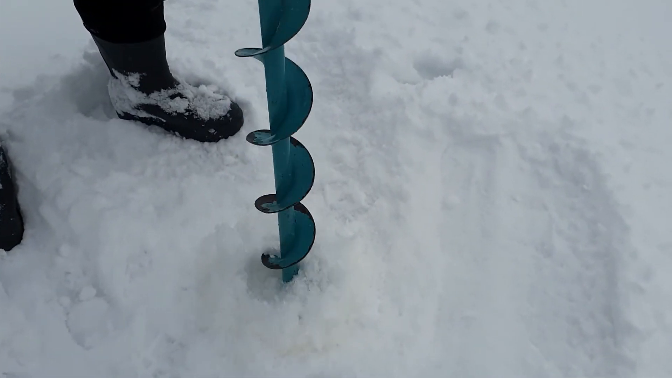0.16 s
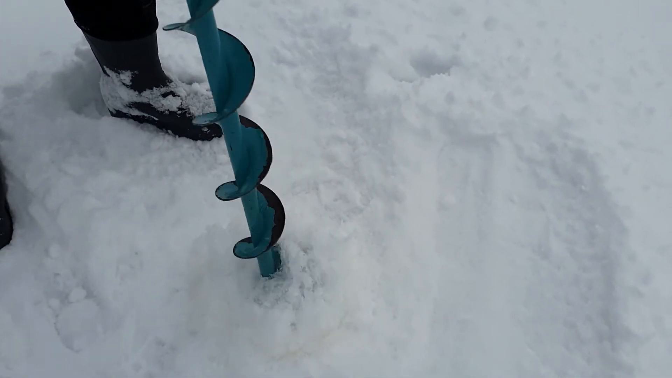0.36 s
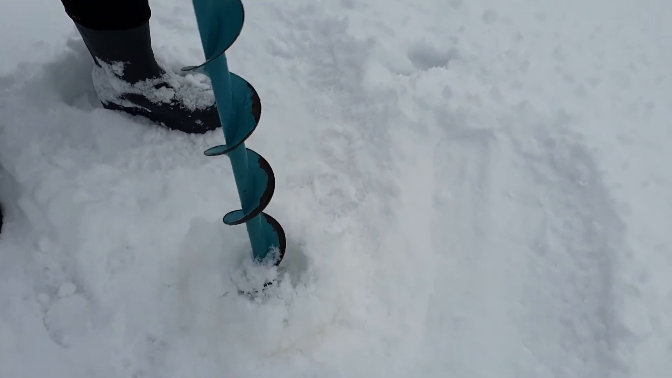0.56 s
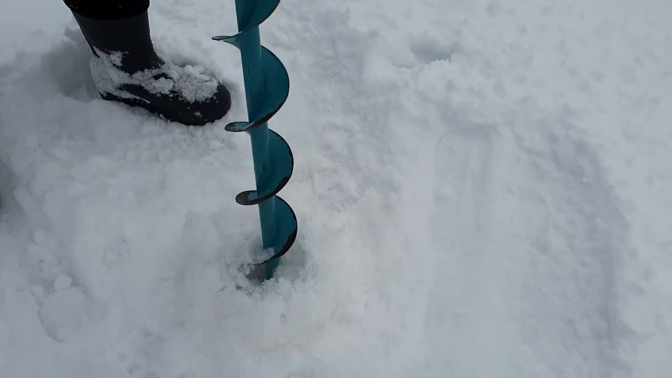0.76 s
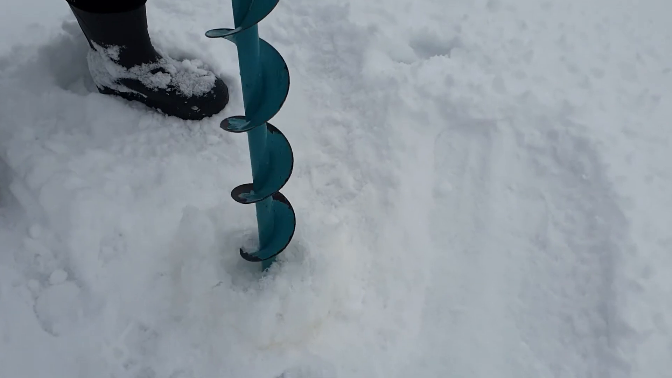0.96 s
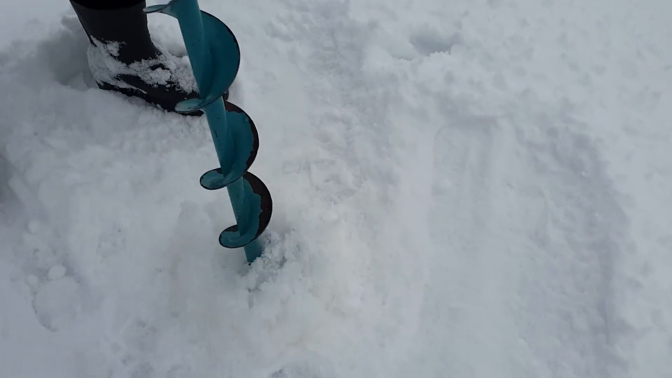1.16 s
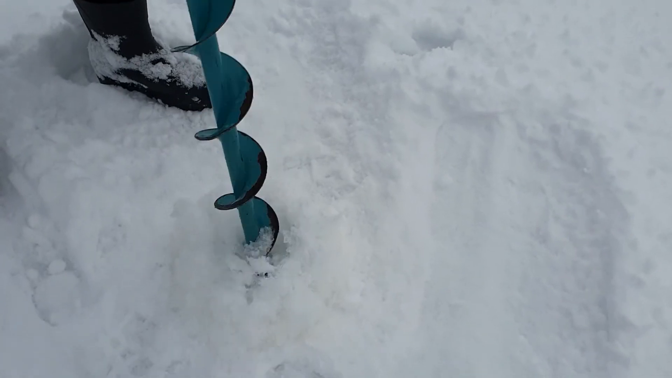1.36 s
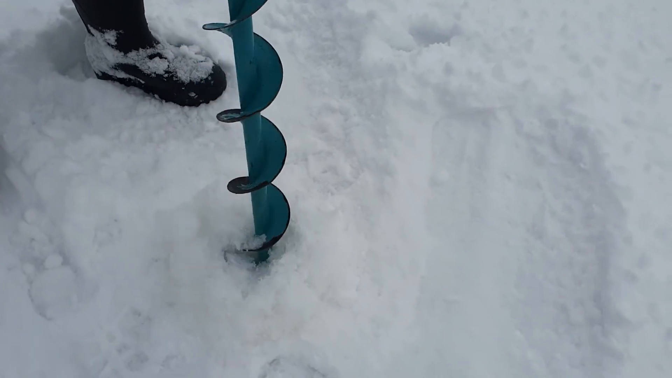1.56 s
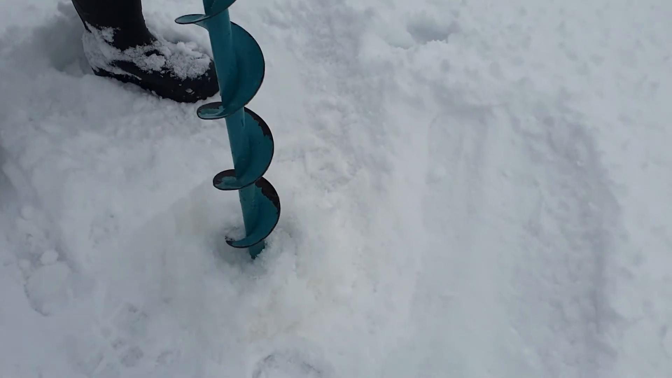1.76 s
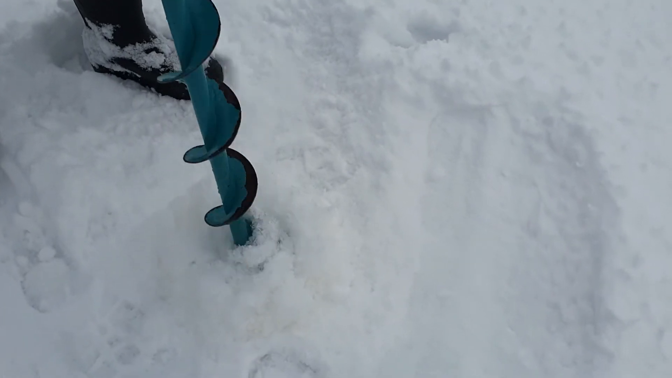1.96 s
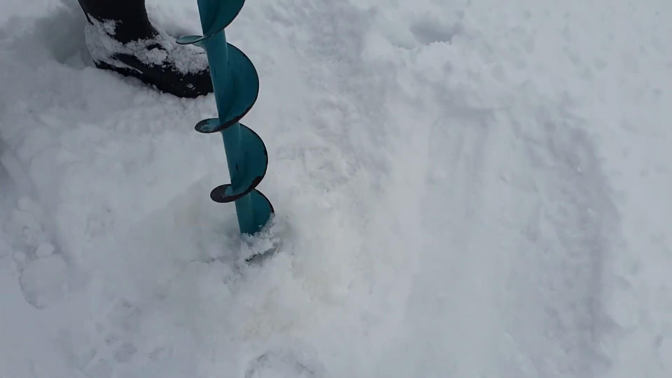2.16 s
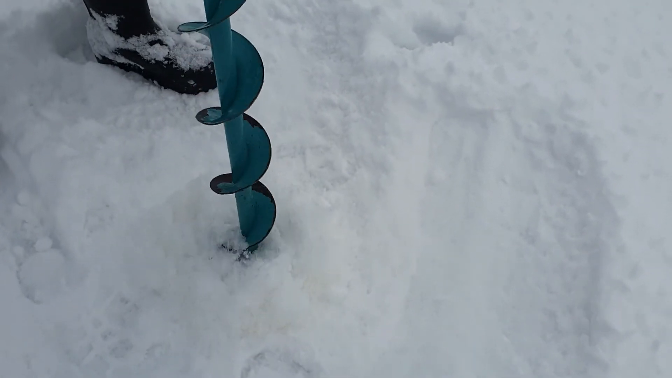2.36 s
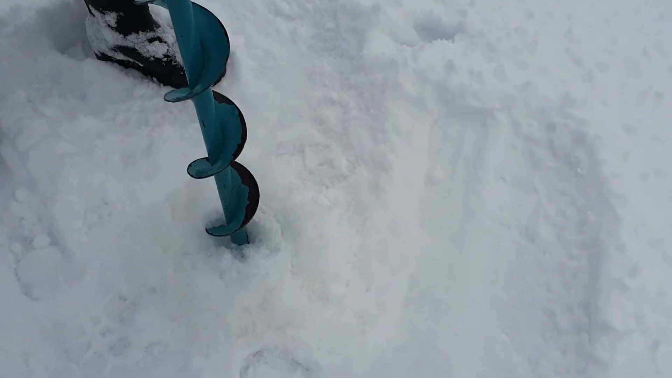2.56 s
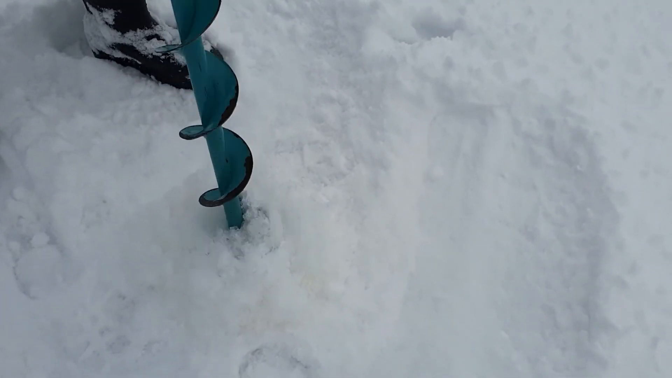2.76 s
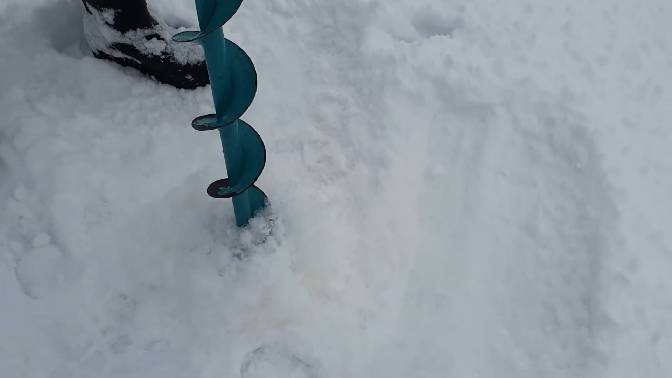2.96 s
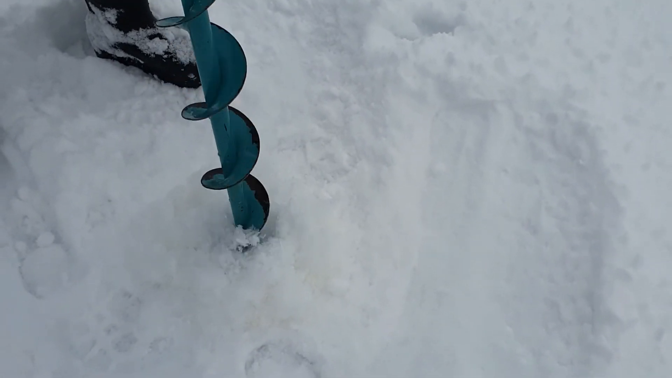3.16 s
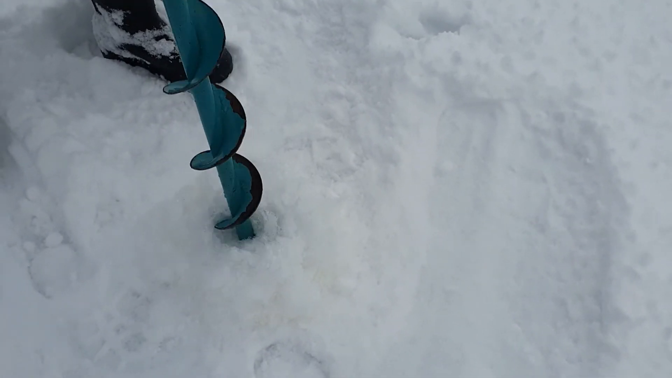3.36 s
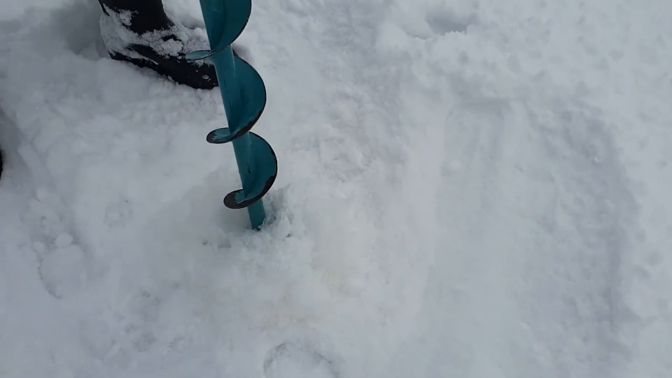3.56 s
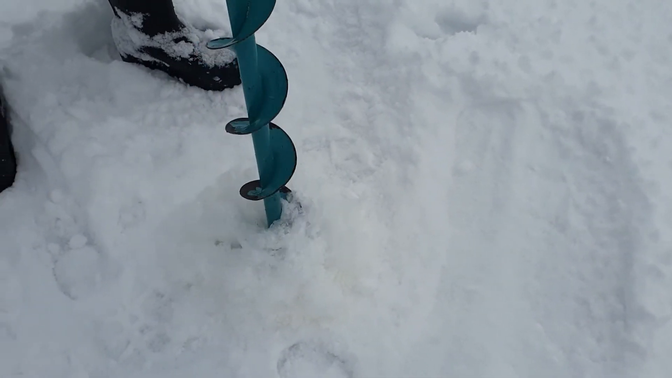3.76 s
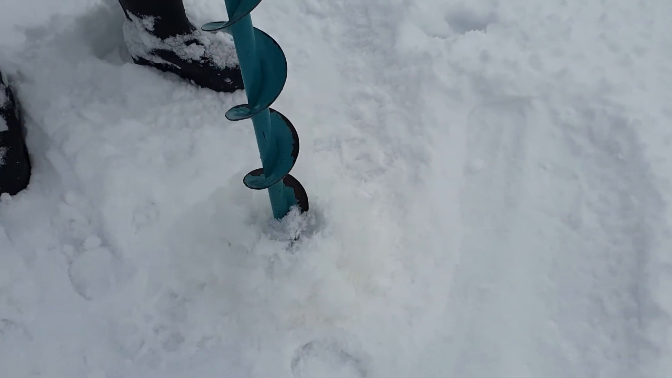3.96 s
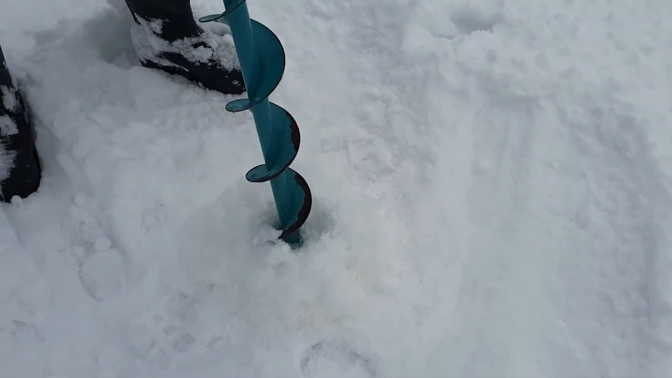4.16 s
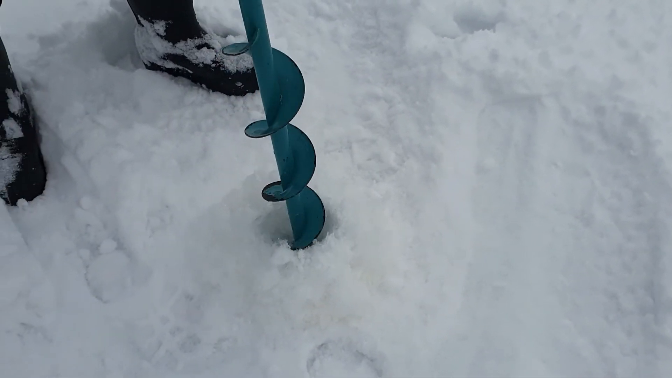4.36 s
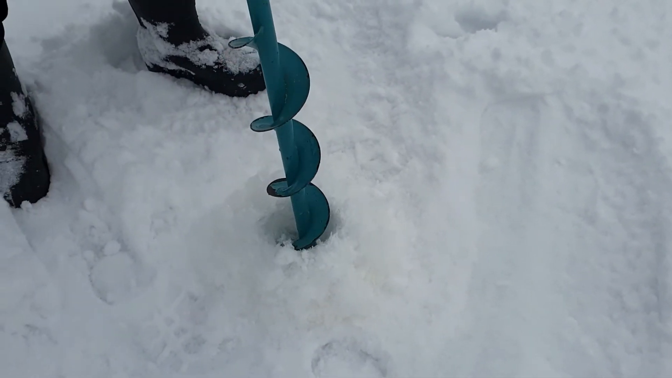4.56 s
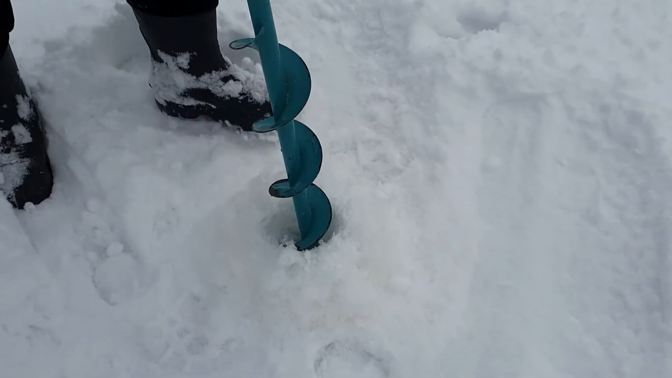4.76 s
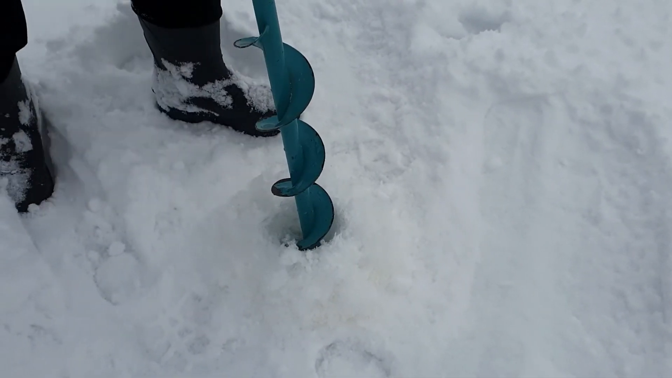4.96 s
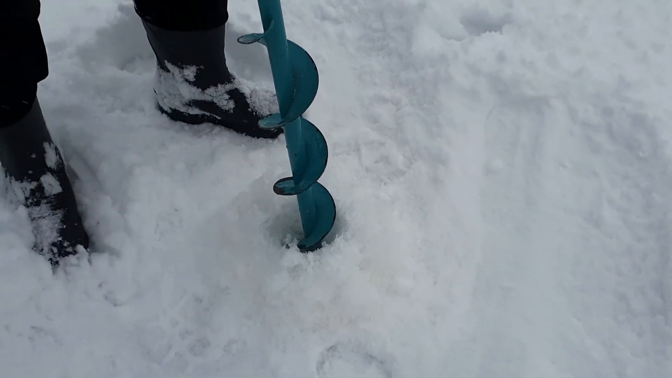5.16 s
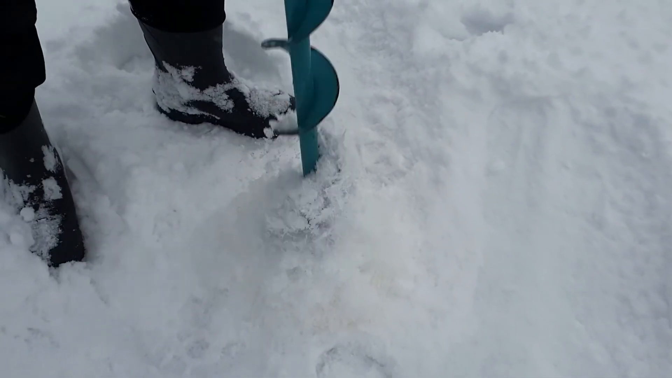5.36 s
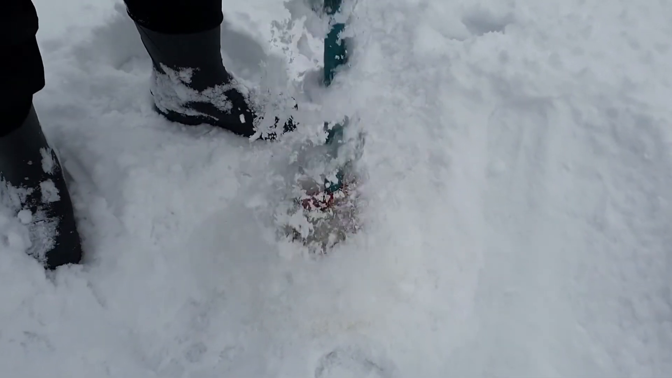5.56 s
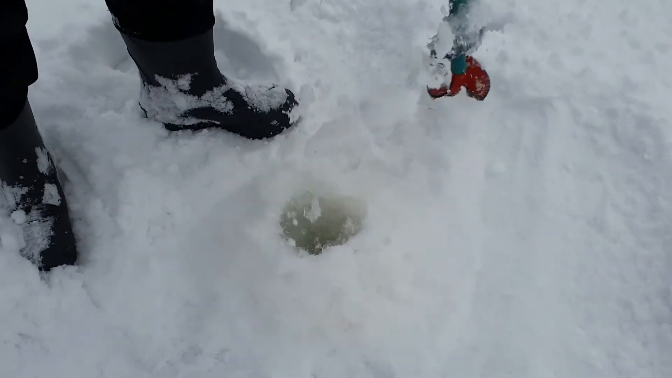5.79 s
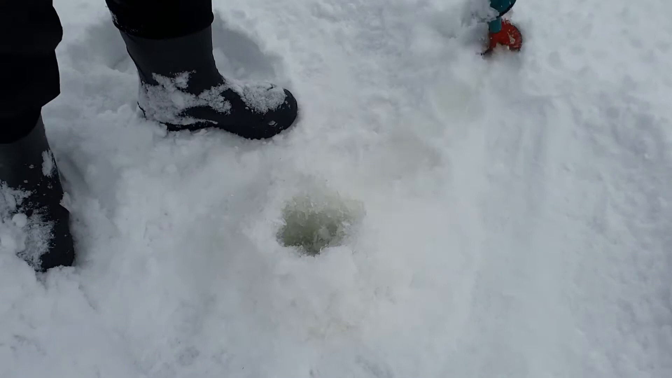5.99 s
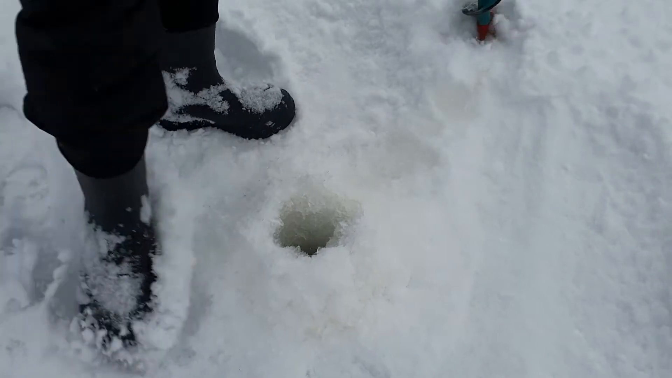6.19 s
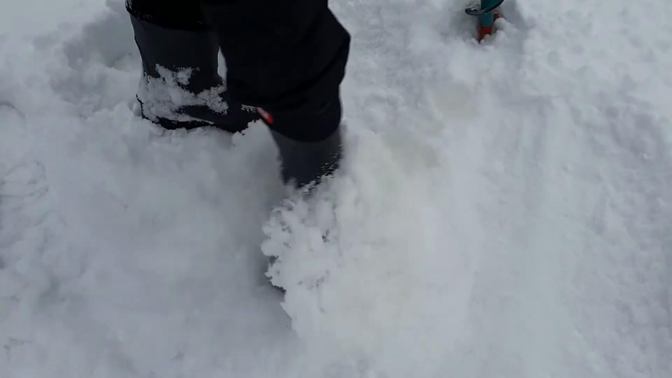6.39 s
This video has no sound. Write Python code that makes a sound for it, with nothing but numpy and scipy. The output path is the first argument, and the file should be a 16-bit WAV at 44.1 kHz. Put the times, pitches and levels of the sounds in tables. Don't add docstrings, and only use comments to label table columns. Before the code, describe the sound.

Outdoors on snow-covered river ice, heard close in dry stereo. From 0 to about 4.2 seconds a hand-turned auger grinds steadily, its crunchy, splintering bite swaying with each turn of roughly 0.7 seconds. Ice chips snap irregularly, the steel spiral rings with thin metallic tones, a squeaky pitch climbs each turn, and fine scraping, powdery hiss and low shaft rumble surround it. Blades briefly stall and crack free. Around 4.25 the bit drops through, rattles loosely and dies by 4.4. Near quiet follows, with faint snow creaks and soft boot thuds, a firmer one near 5.05. From 5.3 to 5.55 the spiral is yanked out, rubbing and knocking the hole wall; slush gushes with a jumping, rising hollow pitch until 5.7. Wet lumps thump around 5.8, loose snow trickles, and boots crunch and thud until about 6.4, with a small sharp snap near 6.2.

```python
import sys
import numpy as np
from scipy import signal
from scipy.fft import rfft, irfft
from scipy.io import wavfile

SR = 44100
rng = np.random.default_rng(int(sys.argv[2]) if len(sys.argv) > 2 else 0)


def decibels_to_gain(level_db):
    exponent = np.asarray(level_db, float) / 20
    return 10 ** exponent


def unload_audio(sound):
    columns = np.transpose(np.atleast_2d(sound))
    steps = np.round(np.clip(columns, -1, 1) * 32767)
    wavfile.write(sys.argv[1], SR, steps.astype(np.int16))


N = 283563
T = np.arange(N) / SR
SLOW_T = T[::64]
HZ = np.fft.rfftfreq(4096, 1 / SR)
TURN_S = 0.722
THROUGH_S, LIFTING_S = 4.252, 5


def evened(x):
    return x / np.sqrt(np.mean(x ** 2) + 1e-20)


def read(points, hz):
    f, value = np.transpose(points)
    return np.interp(np.log(hz + 1), np.log(f + 1), value)


def along(rows):
    s, level, *others = np.transpose(rows)
    first = np.interp(T, s, level, left=-140, right=-140)
    return [first] + [np.interp(T, s, column) for column in others]


def smooth(slow):
    return np.interp(T, SLOW_T, slow)


def drift(top_hz):
    count = len(SLOW_T)
    z = rfft(rng.standard_normal(count))
    return evened(irfft(z / (1 + (np.fft.rfftfreq(count, 64 / SR) / top_hz) ** 2), count))


def colour(x, points):
    log_gain = np.log(decibels_to_gain(np.maximum(read(points, HZ), -90)))
    circle = np.concatenate([log_gain, log_gain[-2:0:-1]])
    taps = np.fft.ifft(np.exp(np.conj(signal.hilbert(circle)))).real[:2048]
    return signal.oaconvolve(x, taps / np.linalg.norm(taps))[:len(x)]


def ring(x, hz, width):
    r = np.exp(-np.pi * width / SR)
    return signal.lfilter([(1 - r * r) / 2, 0, (r * r - 1) / 2], [1, -2 * r * np.cos(2 * np.pi * hz / SR), r * r], x)


def glide(x, hz, width):
    turn = np.exp(2j * np.pi * np.cumsum(hz) / SR)
    r = np.exp(-np.pi * width / SR)
    return 2 * (turn * signal.lfilter([1 - r], [1, -r], x / turn)).real


def chips(per_s, spread_db, burst_ms, bed):
    size = decibels_to_gain(spread_db * np.minimum(rng.exponential(1, N), 4)) * (rng.random(N) < per_s / SR)
    r = np.exp(-1000 / (burst_ms * SR))
    bursts = evened(signal.lfilter([1], [1, -r], size))
    return evened((bed + bursts) * rng.standard_normal(N))


def add(mix, s, sound):
    part = mix[round(s * SR):][:len(sound)]
    part += sound[:len(part)]


# time_s, level_db
PRESS = [(0.0, -21.5), (0.4, -21.5), (0.48, -19), (0.62, -26), (0.76, -28.5), (0.84, -19.5), (0.95, -22.5),
         (1.29, -20.5), (1.48, -23.5), (1.88, -19), (2.3, -22), (3.0, -23), (3.31, -20.5), (3.45, -23.5),
         (3.55, -22), (3.76, -24), (3.81, -19.5), (3.93, -26.5)]
# time_s, level_db
THROUGH = [
    (3.931, -25.5),
    (4.06, -21),
    (4.14, -24),
    (4.235, -24),
    (4.255, -25),
    (4.32, -20.5),
    (4.369, -32),
    (4.39, -43.5),
    (4.56, -67),
]
# time_s, level_db
LIFT = [
    (5.26, -65),
    (5.292, -34),
    (5.308, -39),
    (5.318, -24),
    (5.36, -30),
    (5.41, -23),
    (5.455, -25),
    (5.49, -16),
    (5.502, -30),
    (5.68, -51),
]
# usual_db, lost_db (per dB of harder cut), ceiling_db
SHARES = [
    [(-9.5, 1.1, -2.5), (-19, 0.5, -14), (-10, 1.48, 3)],
    [(-4, -0.1, 3), (-14, 0.2, -5), (-13.5, -0.5, -4)],
    [(-20, 1.3, 0), (-41, 2.5, -14), (-36, 0, -11)],
]
# cosine_db, sine_db (of crank angle), deeper_db (per second)
CRANK = [(-1.2, 4.8, -2.1), (.5, -.2, -.7), (-.4, -.2, -.05)]


def effort():
    cut_db = np.max([along(rows)[0] for rows in (PRESS, THROUGH, LIFT)], axis=0)
    stage = (T > THROUGH_S).astype(int) + (T > LIFTING_S)
    angle, layers = 2 * np.pi * T / TURN_S, []
    for k, (cos_db, sin_db, deeper_db) in enumerate(CRANK):
        usual_db, lost, top_db = (column[stage] for column in np.array(SHARES)[:, k].T)
        turn_db = (cos_db * np.cos(angle) + sin_db * np.sin(angle) + deeper_db * T) * (stage == 0)
        layers.append(np.minimum(usual_db - lost * (cut_db + 22), top_db) + turn_db)
    return cut_db, *layers


# time_s, peak_db, snap_hz
CRACKS = [(0.417, -13, 2030), (0.439, -4, 2040), (0.469, -5, 2100), (0.819, -10, 1540), (0.879, -4.5, 1900),
          (0.947, -4, 1510), (0.977, -3, 2070), (1.101, -7, 2750), (1.172, -6.5, 2130), (1.216, -12, 2110),
          (1.897, 0, 1490), (1.922, -2.5, 2680), (2.183, -3.5, 1740), (2.221, -11, 2080),
          (2.776, -4.5, 2470), (3.027, -4, 2600), (3.316, -6, 2150), (3.363, -10, 2210), (3.628, -2, 2170),
          (3.649, -2, 1490), (3.95, -9, 1070), (4.2014, -7, 2170), (4.216, -5, 2200)]
# time_s, peak_db, snap_hz
FLAKES = [(0.0394, -9, 2010), (0.0644, -7, 1520), (0.1044, -8, 2210), (0.1344, -6, 2050),
          (0.1644, -9, 2050), (0.3002, -8, 2020), (0.3444, -8, 2070), (0.3844, -11, 2700),
          (0.4953, -9, 2080), (0.7756, -14, 1860), (0.8444, -8, 1990), (1.0294, -10, 2030),
          (1.3169, -10, 2450), (1.3877, -10, 1530), (1.4546, -9, 1820), (1.5584, -9, 1510),
          (1.5798, -8, 1230), (1.6327, -8, 2050), (1.7235, -6, 2050), (1.7918, -7, 2720),
          (1.8347, -8, 2710), (1.8572, -7, 2050), (1.9969, -12, 2210), (2.0677, -10, 1740),
          (2.0894, -10, 2030), (2.148, -10, 2060), (2.2767, -10, 1490), (2.3394, -11, 2050),
          (2.4319, -11, 2080), (2.4563, -12, 1440), (2.4894, -8, 2080), (2.7217, -12, 1130),
          (2.7472, -13, 1770), (2.8734, -9, 1880), (2.9387, -11, 1970), (3.7424, -10, 1960),
          (3.7958, -7, 2030), (3.8114, -9, 2000), (3.8407, -9, 2030), (4.0677, -10, 1530),
          (4.1014, -8, 2160), (4.1129, -5, 2160), (4.156, -12, 2160)]
# time_s, peak_db, snap_hz, stall_db (just before)
CATCHES = [(0.229, -5, 2200, -9), (0.256, -6, 2040, -6), (0.629, -6, 2360, -15), (0.675, -4, 2270, -21),
           (0.702, -7, 1990, -5.5), (0.731, -6, 1820, -2), (1.265, -7, 1120, -2), (1.479, -2, 1840, -9),
           (2.524, -2, 2040, -8), (3.203, -1, 2130, -9), (3.676, -3, 1490, -7), (3.137, -5.5, 2050, -6),
           (3.165, -3, 2620, -12), (3.8736, 1, 1950, -8), (3.9853, 0, 2500, -5), (4.091, -4, 1280, -8),
           (4.233, -2, 1970, -8)]
# time_s, peak_db, snap_hz, lull_db (just before), fade_ms
KNOCKS = [(4.262, -4, 3300, 1, 15), (4.299, -7, 3360, -19.5, 5), (4.316, -5, 3430, -1, 14),
          (4.364, -2.5, 2600, -1, 5.4), (4.416, -30, 3190, 0, 5), (4.524, -32, 3190, 0, 3),
          (5.284, -26, 1820, 7, 6.8), (5.318, -5.5, 1040, -4, 13.5), (5.344, -5, 2780, 4, 7.6),
          (5.367, -3, 1100, -18, 14), (5.408, -9, 2050, -3, 11), (5.464, -8, 1630, -2.5, 6.8),
          (5.479, -6, 2000, -3, 12), (5.518, -15, 1990, -6, 7), (5.531, -9.5, 1990, -6, 7),
          (5.567, -19, 2000, -11, 9), (6.228, -13, 2100, -4, 8.9)]


def fractures():
    breaks = [(*row, -3, 3.6) for row in CRACKS] + [(*row, 3.4) for row in CATCHES] + KNOCKS
    breaks += [(s, db + 1.5, hz, -2.5, 5.5) for s, db, hz in FLAKES]
    stall_db, jolts, snaps = np.zeros(N), np.zeros(N), np.zeros(N)
    t = np.arange(1800) / SR
    for (s, db, hz, before_db, ms), noise in zip(breaks, rng.standard_normal((len(breaks), len(t)))):
        lead_s = 0.008 + 0.0011 * abs(before_db)
        build = np.minimum(np.arange(round((lead_s + 0.003) * SR)) / (lead_s * SR), 1)
        add(stall_db, s - lead_s, before_db * build)
        burst = noise * (1 - np.exp(-t / 0.00036)) * np.exp(-1000 * t / max(ms, 1))
        add(jolts, s, decibels_to_gain(db - 14.5) * burst)
        snap = ring(ring(burst, hz, 900), hz, 900)
        add(snaps, s, decibels_to_gain(db - 8.7) * snap / abs(snap).max())
    return stall_db, jolts, snaps


# low_hz, high_hz, width_hz, level_db
CLIMB = [(1720, 2330, 70, -12.5), (2450, 2850, 80, -22)]


def squeezed_air(drives):
    turned = (T - 0.6) / TURN_S % 1
    out = np.zeros(N)
    for drive, (low_hz, high_hz, width, db) in zip(drives, CLIMB):
        swell = decibels_to_gain(db + 2.5 * smooth(drift(9.0))) * np.sin(np.pi * turned ** 1.4) * (T < THROUGH_S)
        out += glide(drive * swell, low_hz + (high_hz - low_hz) * turned, width)
    return out


# pitch_hz, width_hz, level_db, cosine_db, sine_db (swing with crank angle),
# deeper_db (per second as the hole deepens)
SPIRAL = [(680, 50, -20.5, 0, 1.2, -0.94), (1040, 225, -22.5, -0.77, 1.45, 0.44),
          (1127, 46, -14.5, 0, -1.5, -0.3), (1249, 34, -21.5, 0.5, 1.3, -0.098),
          (1490, 80, -13.5, 0.5, 0.67, 0.29), (1766, 70, -13.5, 1.4, -0.05, -0.18),
          (1900, 98, -23, 1, 1, 0.16), (2045, 50, -8.5, -1, 0, -0.17), (2170, 54, -14.5, 0.24, -1.14, 0.21),
          (2240, 45, -19, 0.7, -2.5, -1.05), (2470, 130, -34.5, 8, -7, -1.25),
          (2740, 75, -16, -1.5, 0.37, -0.05), (3065, 70, -17.5, 2, 1, -0.21),
          (3245, 65, -13.5, 1, 0.46, -1.3), (3430, 60, -23, 1.5, 4, -0.76),
          (5350, 40, -6.5, 0.5, 0.5, -0.95), (5690, 60, -1, 1.5, 0.9, 0.04),
          (5913, 35, 0, -1.5, 1.85, -0.63), (6590, 70, -5, -5, -2.5, -0.32)]


def spiral(drives, scrape_db, freed_db):
    angle = 2 * np.pi * SLOW_T / TURN_S
    depth = np.where(SLOW_T > LIFTING_S, 2, SLOW_T)
    steel, power = np.zeros(N), 0
    for k, (hz, width, db, cos_db, sin_db, deeper_db) in enumerate(SPIRAL):
        swing_db = cos_db * np.cos(angle) + sin_db * np.sin(angle) + deeper_db * depth
        aim_db = db + 2.73 * swing_db + 1.7 * drift(9.0)
        if hz > 4000:
            aim_db += scrape_db[::64] - 12.5
        else:
            aim_db += freed_db[::64] * np.clip(np.log2(hz / 2500) / 0.57, -1, 1)
            power += decibels_to_gain(2 * db) * width * np.pi / SR
        damped_width = max(width, hz / 90)
        steel += ring(drives[k % 3] * smooth(decibels_to_gain(aim_db)), hz, damped_width)
    return (steel + squeezed_air(drives)) / np.sqrt(power)


# pitch_hz, width_hz, level_db
SHAFT = [(72, 31, -28), (164.8, 14.7, -2), (179.6, 50, -3.5), (270, 30, -16.5)]


def shaft(push, shaft_db):
    twice = np.cos(4 * np.pi * T / TURN_S) * (T <= LIFTING_S)
    out = np.zeros(N)
    for hz, width, db in SHAFT:
        wobble_db = -5.5 * (hz > 200) * twice
        out += decibels_to_gain(db) * ring(push * decibels_to_gain(shaft_db + 21.5 + wobble_db), hz, width)
    return out


# pitch_hz, level_db (per Hz)
CRUNCH = [(120, -51.5), (200, -10.5), (414, -12.5), (681, -2.5), (759, -12), (1110, -5), (1660, -2),
          (2110, -6), (2450, -10), (2760, -10.5), (5000, -23.5), (6500, -14.5), (11000, -120)]
# pitch_hz, level_db (per Hz)
SCRAPE = [(2180, -27.5), (3700, -10.5), (4870, -2.5), (5230, 5), (5870, -5), (6240, -16), (6790, 1),
          (8000, -12), (10400, -20.5), (17600, -120)]
# pitch_hz, level_db (per Hz)
POWDER = [(4590, -28), (7800, 5.5), (8180, -6.5), (9510, 3.5), (14000, -1), (15200, -1.5), (16000, -9.5)]


def auger():
    cut_db, scrape_db, powder_db, shaft_db = effort()
    stall_db, jolts, snaps = fractures()
    press = decibels_to_gain(cut_db + stall_db + 0.87 * smooth(drift(15)))
    drives = [press * chips(per_s=520, spread_db=2.3, burst_ms=0.6, bed=0.8) + jolts for _ in range(3)]
    freed_db = np.where(T > LIFTING_S, 0.5, 8.5 * (T > THROUGH_S))
    fine = 0.35 * jolts + 0.59 * drives[1] + 0.79 * press * rng.standard_normal(N)
    dust = 0.34 * drives[2] + 1.27 * press * rng.standard_normal(N)
    push = 0.3 * drives[0] + 0.91 * decibels_to_gain(cut_db + 0.45 * stall_db) * rng.standard_normal(N)
    crunch = decibels_to_gain(-5.5) * colour(drives[0] * decibels_to_gain(-0.6 * freed_db), CRUNCH)
    body = decibels_to_gain(-2.5) * spiral(drives, scrape_db, freed_db) + crunch + snaps + shaft(push, shaft_db)
    return body + colour(fine * decibels_to_gain(scrape_db - 5.5), SCRAPE) + colour(dust * decibels_to_gain(powder_db), POWDER)


# pitch_hz, level_db (per Hz)
AIR = [(12, -32), (20, -2), (81, -2), (262, -27), (472, -14), (607, -20), (1910, -22), (2600, -26),
       (16000, -41)]


def still_air():
    shared = colour(rng.standard_normal(N), AIR)
    separate = np.array([colour(v, AIR) for v in rng.standard_normal((2, N))])
    return decibels_to_gain(-69.5) * (shared + 1.2 * separate)


# time_s, peak_db, ring_hz, slap_db (above the ring)
THUDS = [(4.13, -29, 70, -25.5), (4.239, -26.5, 85, -31), (4.725, -36, 159, -10.5), (4.863, -45.5, 203, -2),
         (4.886, -32, 108, -10), (5.0611, -18.5, 200, -9.5), (5.195, -37, 100, -9), (5.251, -24, 171, -7.5),
         (5.319, -16, 151, -23), (5.838, -26, 130, -8), (5.875, -18, 112, -18), (5.965, -34.5, 156, -8),
         (6.031, -31.5, 173, -1.5), (6.153, -34, 109, -19), (6.188, -24, 129, -2.5), (6.046, -33, 150, -12),
         (6.418, -20, 140, -15)]
# time_s, peak_db, ring_hz, slap_db (above the ring)
LUMPS = [(4.568, -55, 600, -15), (4.979, -47, 502, 1), (5.068, -24, 660, -13), (5.146, -54, 715, 0),
         (5.2438, -27.5, 574, 1.5), (5.317, -13, 407, 2), (5.8152, -9, 460, -11), (5.8252, -21, 520, -8.5),
         (5.836, -7.5, 513, -23), (5.874, -22, 593, -3.5), (6.104, -35, 402, -6), (6.112, -20, 340, -13),
         (6.1845, -27.5, 900, 4), (6.301, -26, 302, -5), (6.356, -37.5, 370, 11), (6.4235, -14, 470, 1)]
# cycles (to die 60 dB at -25 dB), cycles_lost (per dB harder), slap_ms (60 dB)
BLOW = [(8.5, .12, 45), (9, .28, 22.4)]


def thumps():
    out, t = np.zeros(N), np.arange(4500) / SR
    for rows, (cycles, lost, slap_ms) in zip((THUDS, LUMPS), BLOW):
        for (s, db, hz, slap_db), noise in zip(rows, rng.standard_normal((len(rows), len(t)))):
            ring_s = max(cycles - lost * (db + 25), 3) / hz
            fade = decibels_to_gain(-2.5 - 60 * (t / ring_s) ** 1.3)
            body = -np.sin(2 * np.pi * hz * t / (1 + 8.0 * t)) * fade
            wet = evened(signal.lfilter(*signal.butter(2, 1300, fs=SR), noise) + 0.047 * noise)
            slap = wet * decibels_to_gain(-60000 * t / slap_ms)
            add(out, s, decibels_to_gain(db) * (body + decibels_to_gain(slap_db) * slap) * (1 - np.exp(-t / 0.00021)))
    return out


# peak_s, crisp_db, dull_db, fade_s (to swell or fade by 20 dB)
CREAKS = [(4.38, -51, -51, 0.11), (4.741, -63, -64, 0.1), (4.897, -48.5, -45.5, 0.04),
          (5.06, -57, -57, 0.12), (5.179, -44, -44.5, 0.04), (5.29, -52, -68, 0.11),
          (5.39, -44, -34, 0.0869), (5.76, -50, -65, 0.21), (5.86, -42, -41, 0.03), (6.02, -38, -47, .06),
          (6.1, -51, -47, 0.03), (6.2, -54, -57, 0.14), (6.33, -54, -40.5, 0.11), (6.43, -31.5, -36.5, 0.1)]
# start_s, rise_s, end_s, crisp_db, dull_db
TRICKLE = (5.47, 0.02, 6.5, -45, -64)


def treading():
    start, rise, end, *trickle_db = TRICKLE
    t = SLOW_T
    flow = np.clip((t - start) / rise, 0, 1) * np.clip((end - t) / rise + 1, 0.2, 1)
    bed = np.outer(decibels_to_gain([-74, -84]), t > THROUGH_S) + np.outer(decibels_to_gain(trickle_db), flow)
    for s, crisp_db, dull_db, fade_s in CREAKS:
        swell = decibels_to_gain(-20 * (abs(t - s) / max(fade_s, 0.01)) ** 1.4)
        bed = bed + np.outer(decibels_to_gain([crisp_db, dull_db]), swell)
    return [smooth(level) for level in bed]


# time_s, peak_db, fade_ms
CRUST = [
    (4.723, -49.5, 3),
    (5.061, -30.5, 6.6),
    (5.2426, -34, 6.5),
    (6.1838, -22.5, 1.6),
    (6.4225, -40, 3),
]
# pitch_hz, level_db (per Hz)
CRISP = [(470, -58.5), (800, -22), (941, -3), (1180, -14), (1590, -6), (2280, -8.5), (2550, -3.5),
         (6250, -1.5), (8110, -7), (15700, -5.5)]
# pitch_hz, level_db (per Hz)
DULL = [(29, -31.5), (50, 5), (101, -6.5), (162, 3.5), (334, -8.5), (420, -2), (582, -1.5), (732, -5),
        (2500, -21), (3250, -29.5), (5500, -120)]


def snow():
    crisp, dull = treading()
    t = np.arange(1500) / SR
    for s, db, ms in CRUST:
        add(crisp, s, decibels_to_gain(db) * np.exp(-1000 * t / ms))
    grains = chips(per_s=500, spread_db=2.4, burst_ms=1.6, bed=1.6)
    hiss = colour(grains * crisp, CRISP)
    treble = signal.sosfiltfilt(signal.butter(2, 8000, "high", fs=SR, output="sos"), hiss)
    trickling = abs(T - 5.75) < 0.45
    return np.where(trickling, hiss, hiss - 0.55 * treble) + colour(grains * dull, DULL)


# time_s, level_db, pitch_hz
SLUSH = [
    (5.33, -69, 230),
    (5.37, -26, 260),
    (5.44, -29.5, 270),
    (5.49, -28.5, 540),
    (5.54, -39, 480),
    (5.58, -48, 810),
    (5.63, -43, 1160),
    (5.7, -60, 1070),
]


def slush():
    db, hz = along(SLUSH)
    grains = chips(per_s=150, spread_db=3.0, burst_ms=3.4, bed=0.3)
    return decibels_to_gain(db) * evened(glide(grains, hz, 220))


# pitch_hz, likeness (0 to 1)
ALIKE = [(30, .6), (70, .99), (180, .999), (350, .975), (700, .962), (1400, .935), (2800, .93), (5600, .66),
         (10000, .3), (16000, .12)]


def ports(x):
    lead_s, tilt_db = 3.7e-5, -0.35
    hz, _, z = signal.stft(x, SR, nperseg=256, noverlap=192)
    alike = np.clip(read(ALIKE, hz), 0, 1)[:, None]
    side = np.array([1, -1])[:, None, None]
    scatter = np.exp(2j * np.pi * rng.random((2, *z.shape))) * 2
    direct = np.exp(side * 1j * np.pi * hz[:, None] * lead_s)
    mixed = np.sqrt(alike) * direct + np.sqrt(1 - alike) * scatter
    return signal.istft(z * mixed * decibels_to_gain(side * tilt_db), SR, nperseg=256, noverlap=192)[1][:, :N]


def scene():
    return ports(auger() + thumps() + snow() + slush()) + still_air()


def top_cut(x):
    return signal.sosfilt(signal.butter(12, 16480, fs=SR, output="sos"), x)


def record(dry):
    cut = signal.sosfilt(signal.butter(2, 55, "high", fs=SR, output="sos"), dry)
    limited = 0.98 * np.tanh(cut / 0.89)
    edge = signal.firwin(511, 15830, window=("kaiser", 8), fs=SR)
    return top_cut(signal.oaconvolve(limited, edge[None], "same"))


dry = scene()
out = record(dry)
unload_audio(out)
```